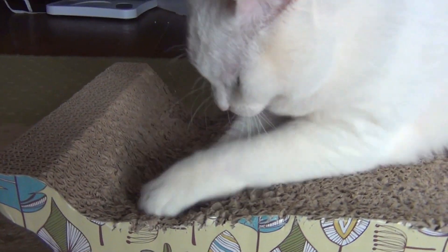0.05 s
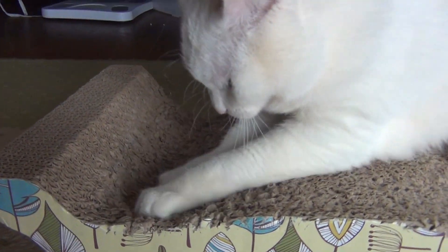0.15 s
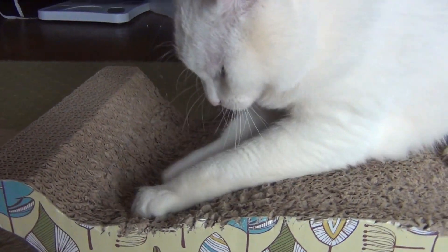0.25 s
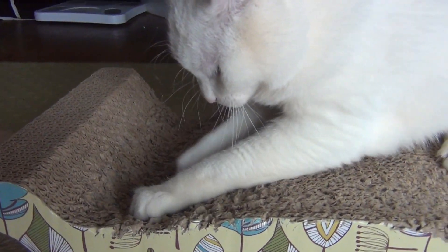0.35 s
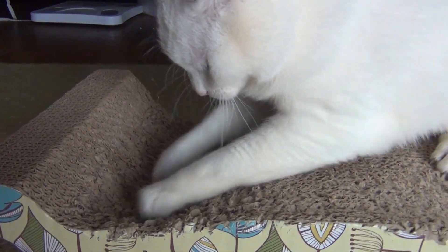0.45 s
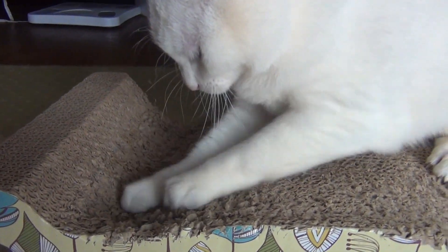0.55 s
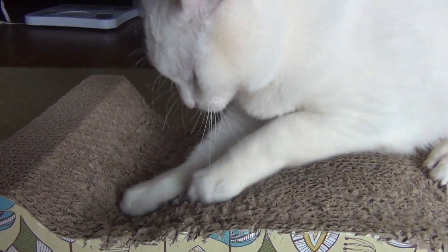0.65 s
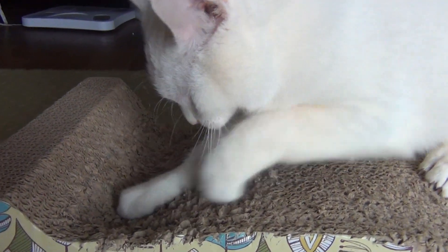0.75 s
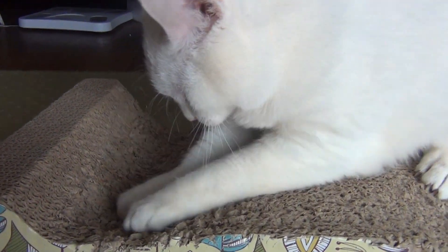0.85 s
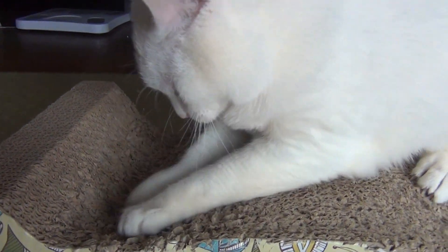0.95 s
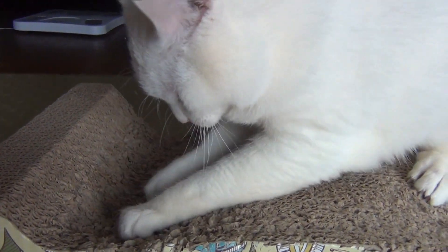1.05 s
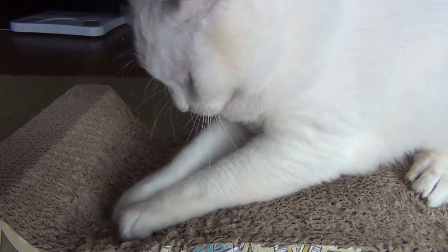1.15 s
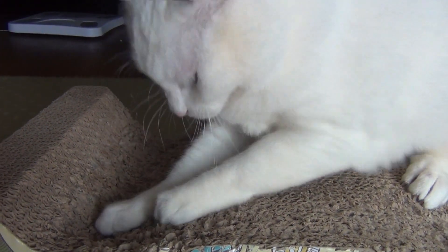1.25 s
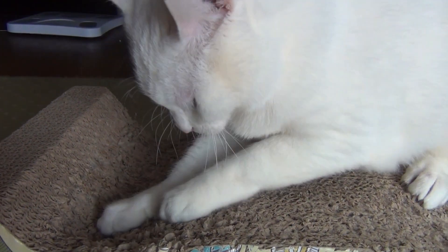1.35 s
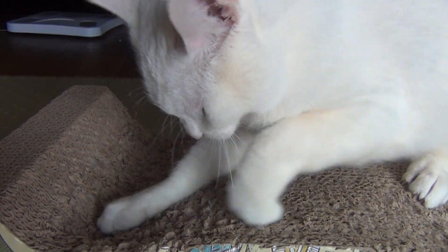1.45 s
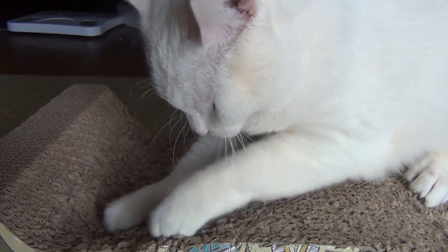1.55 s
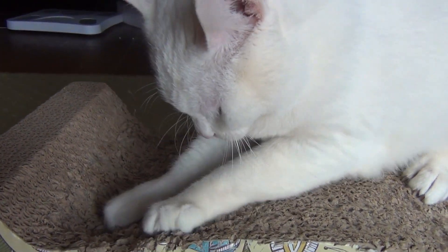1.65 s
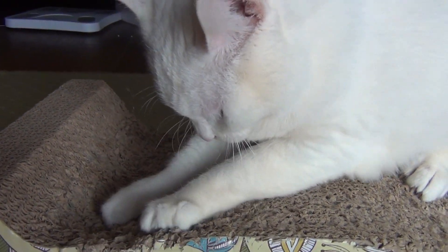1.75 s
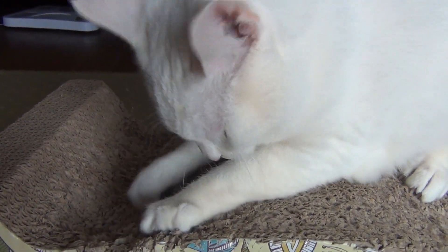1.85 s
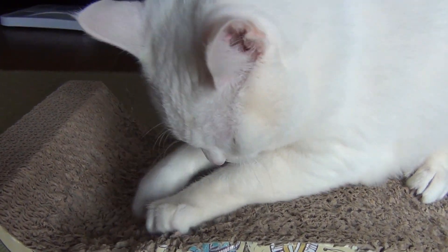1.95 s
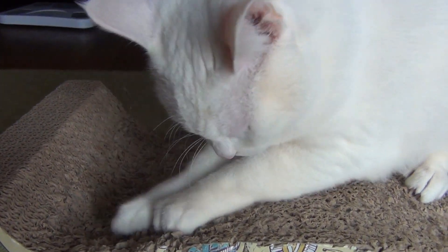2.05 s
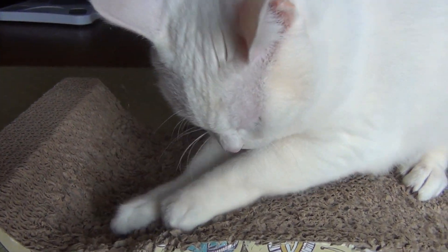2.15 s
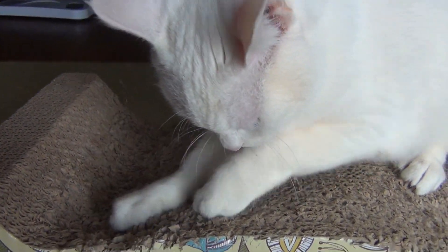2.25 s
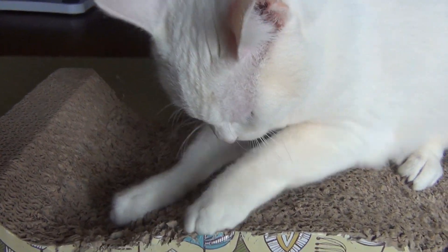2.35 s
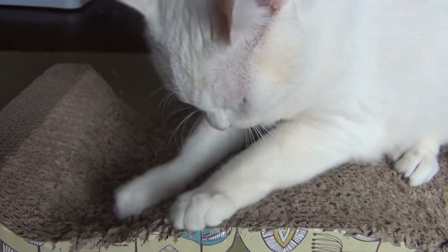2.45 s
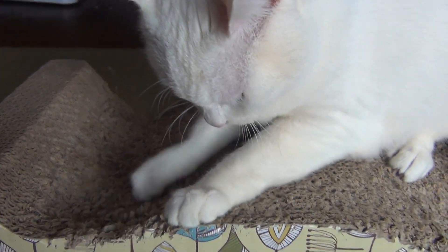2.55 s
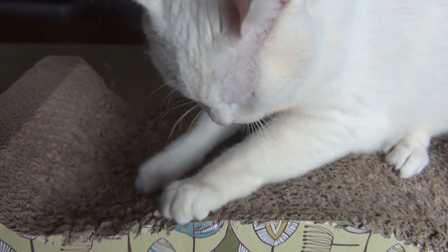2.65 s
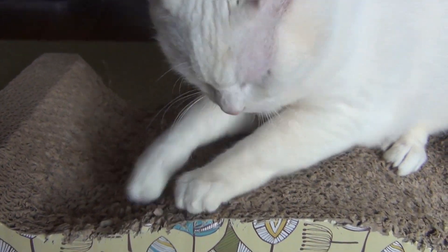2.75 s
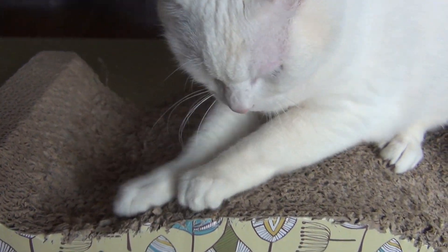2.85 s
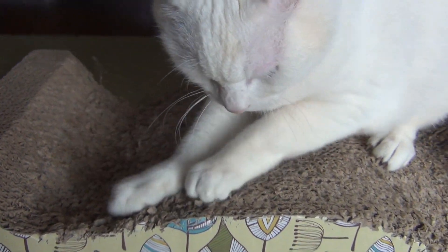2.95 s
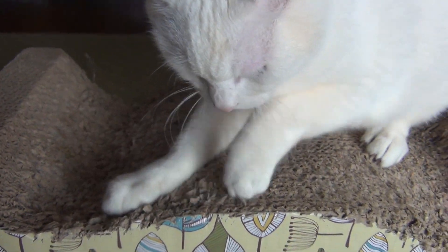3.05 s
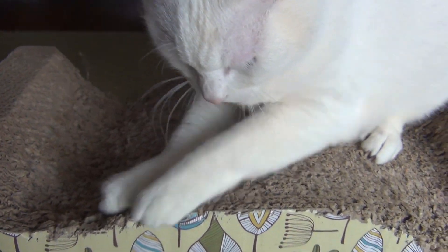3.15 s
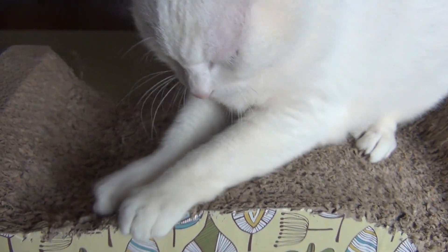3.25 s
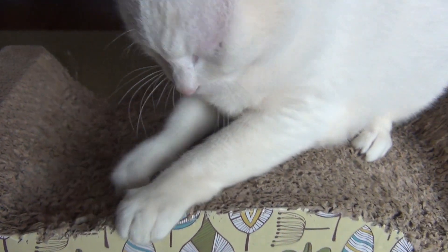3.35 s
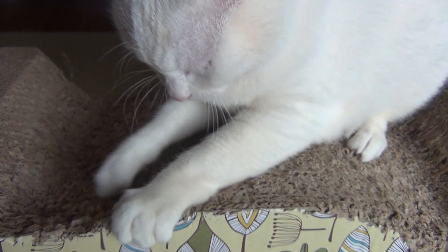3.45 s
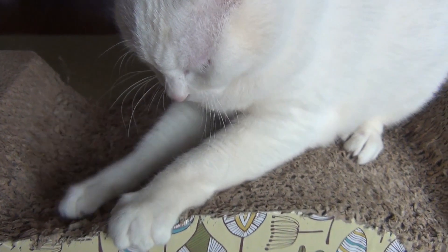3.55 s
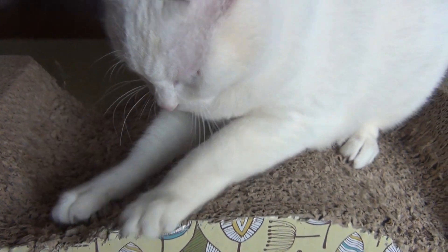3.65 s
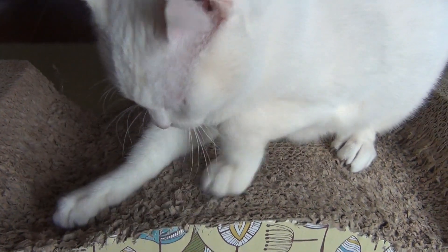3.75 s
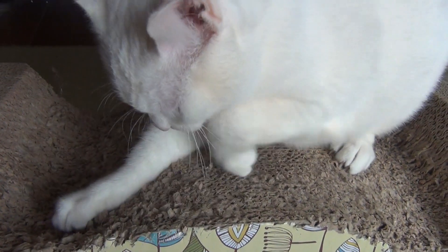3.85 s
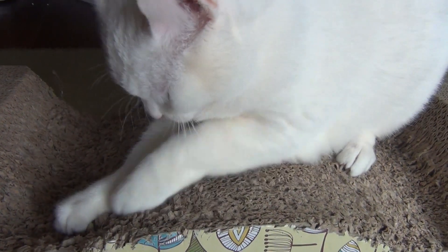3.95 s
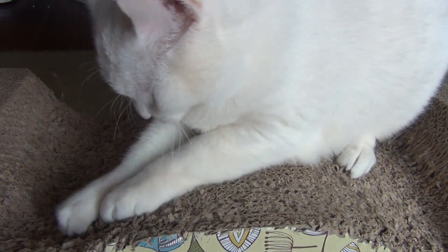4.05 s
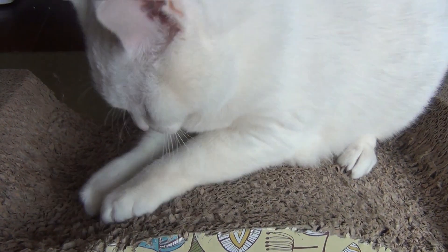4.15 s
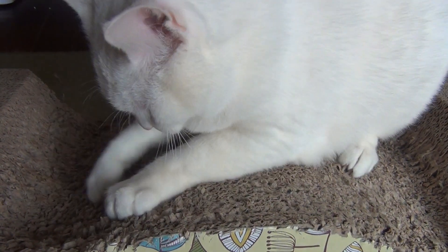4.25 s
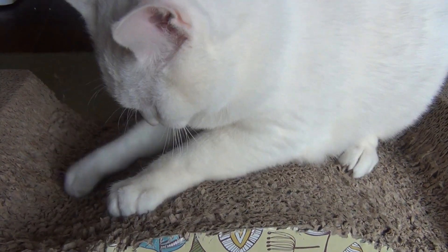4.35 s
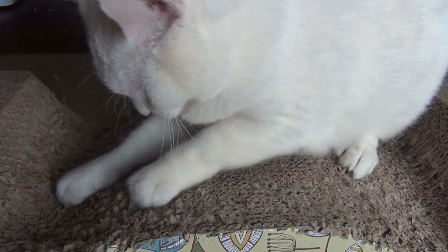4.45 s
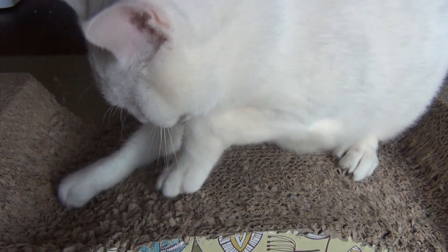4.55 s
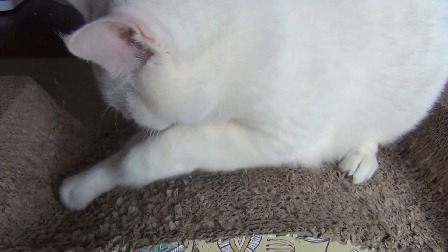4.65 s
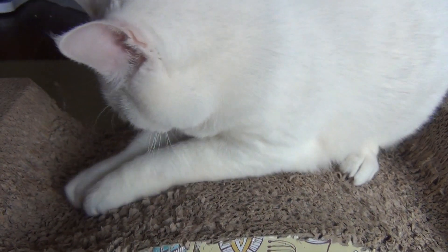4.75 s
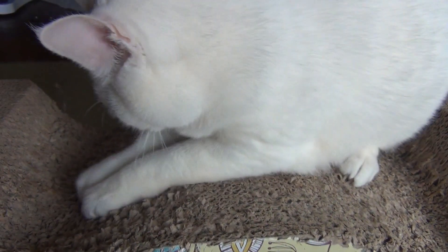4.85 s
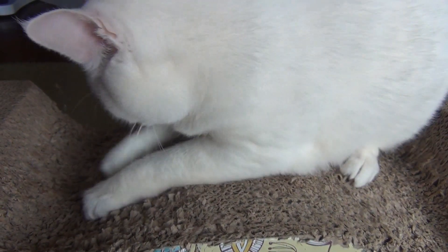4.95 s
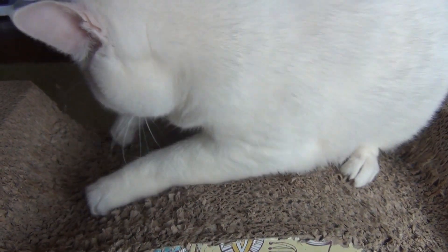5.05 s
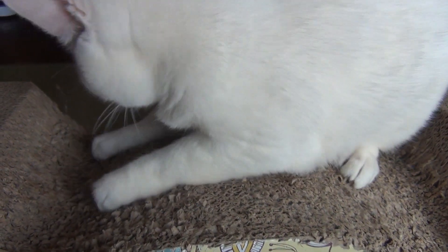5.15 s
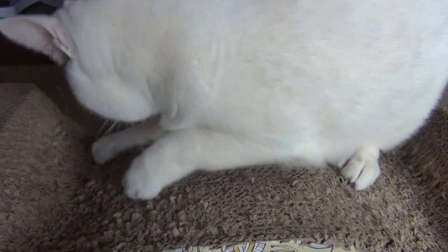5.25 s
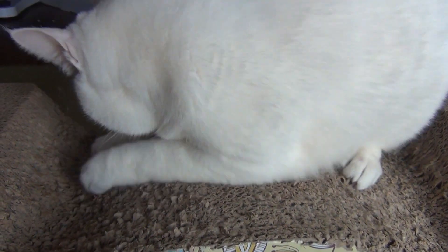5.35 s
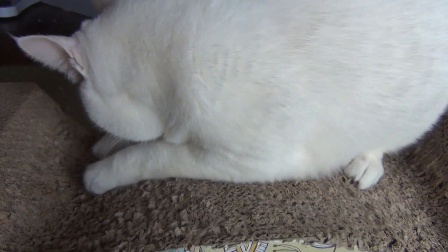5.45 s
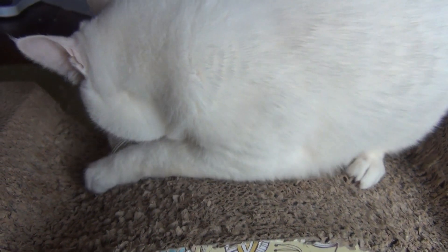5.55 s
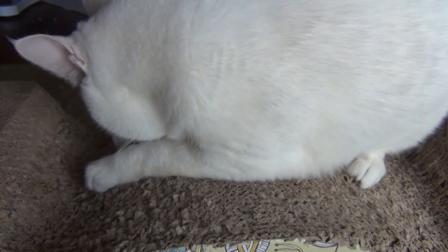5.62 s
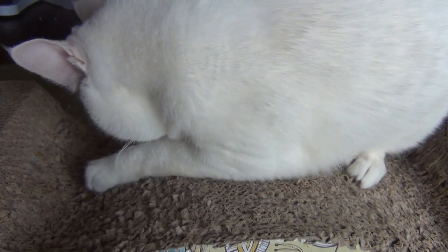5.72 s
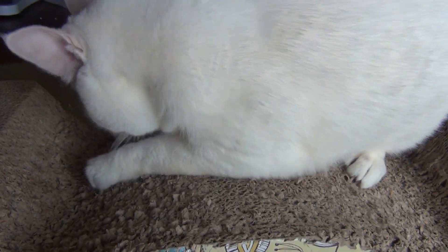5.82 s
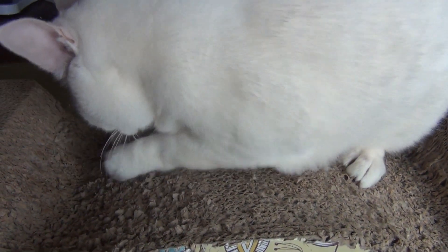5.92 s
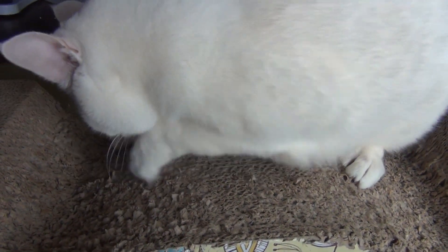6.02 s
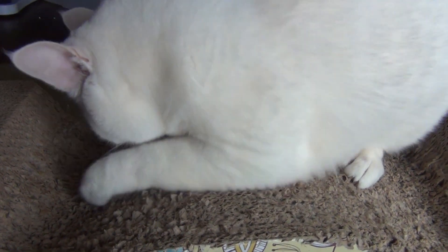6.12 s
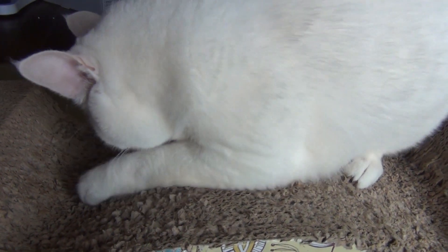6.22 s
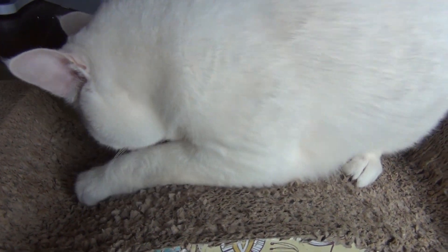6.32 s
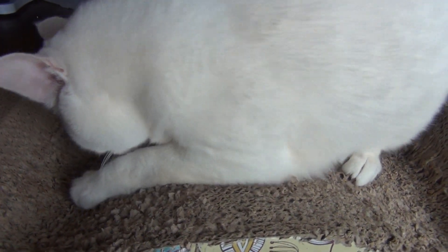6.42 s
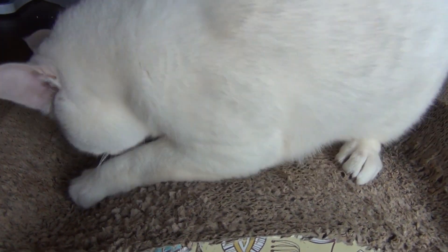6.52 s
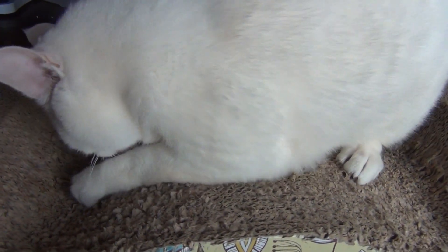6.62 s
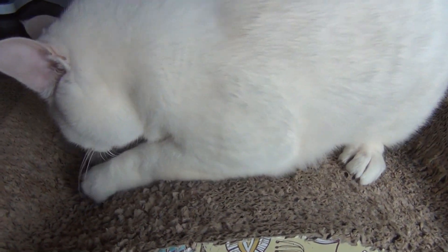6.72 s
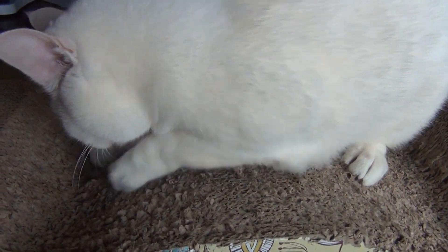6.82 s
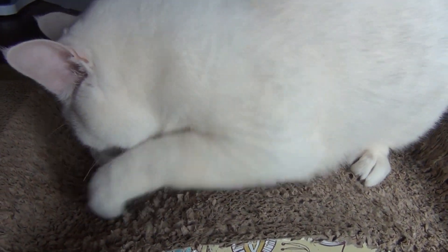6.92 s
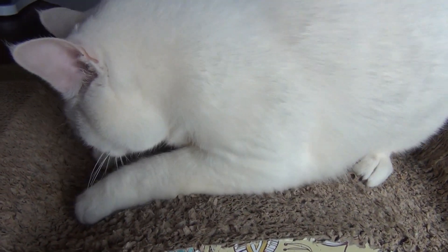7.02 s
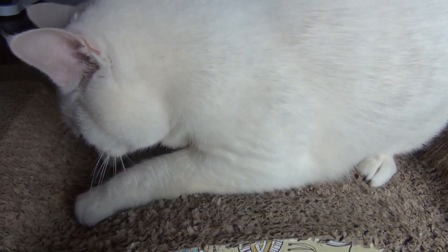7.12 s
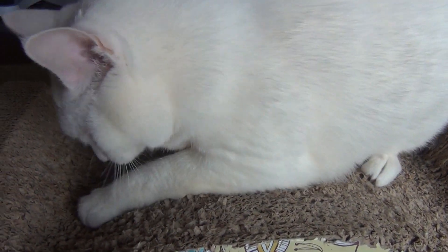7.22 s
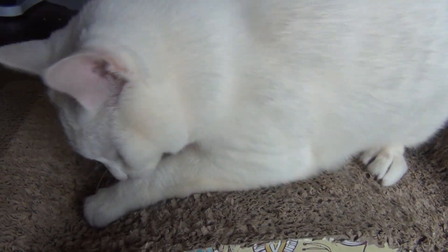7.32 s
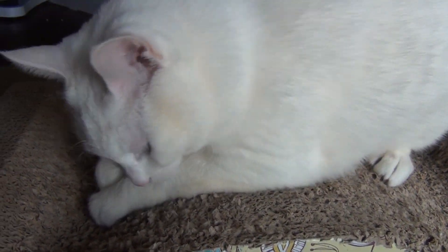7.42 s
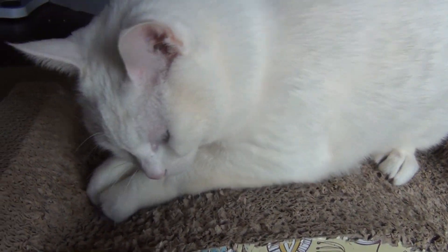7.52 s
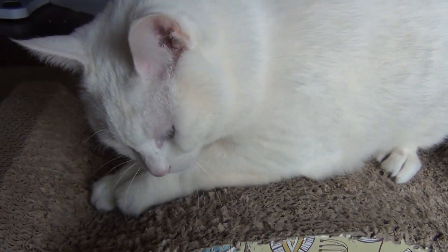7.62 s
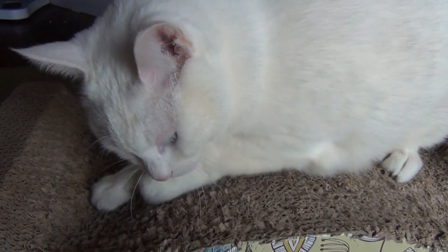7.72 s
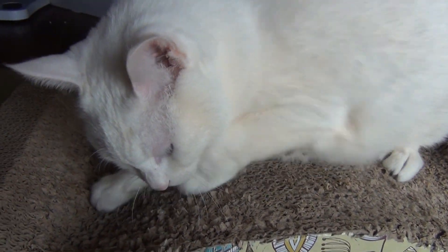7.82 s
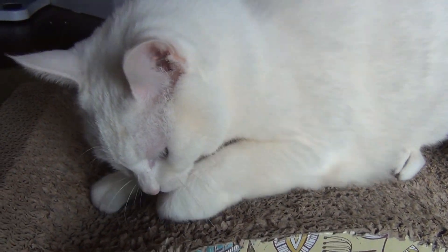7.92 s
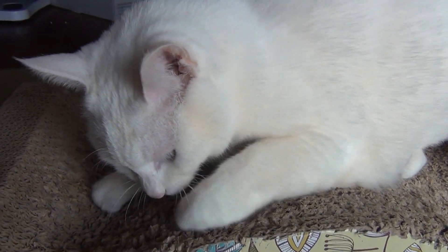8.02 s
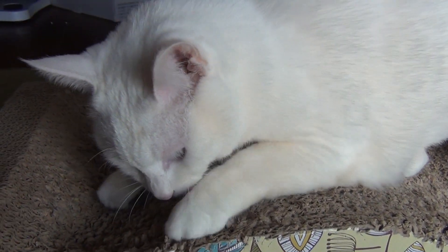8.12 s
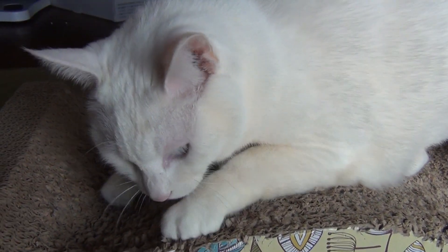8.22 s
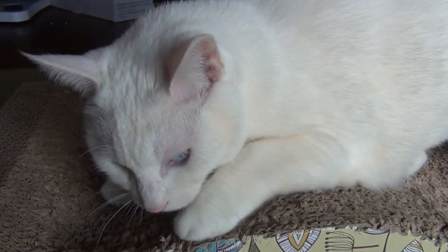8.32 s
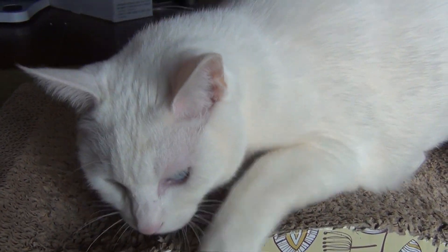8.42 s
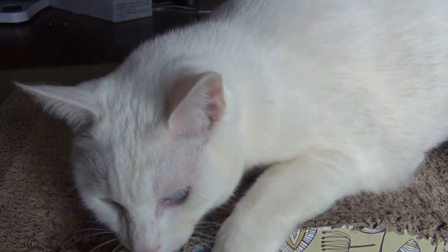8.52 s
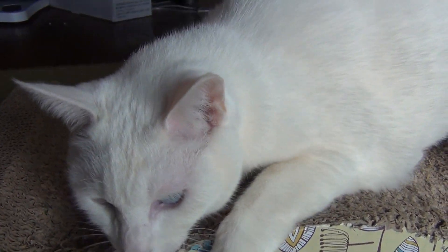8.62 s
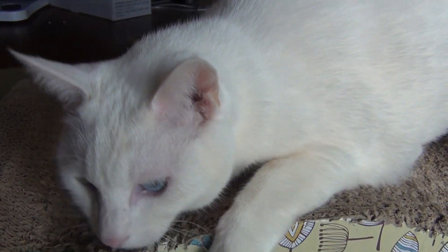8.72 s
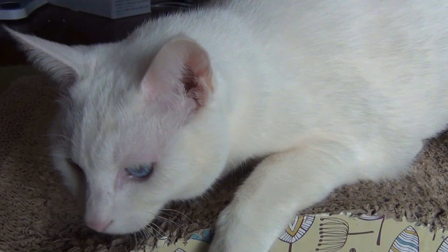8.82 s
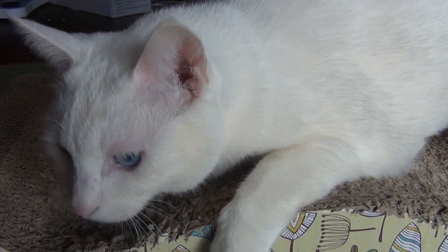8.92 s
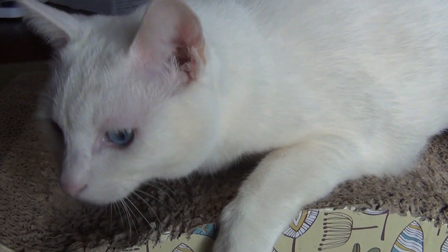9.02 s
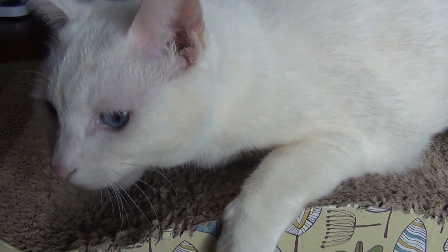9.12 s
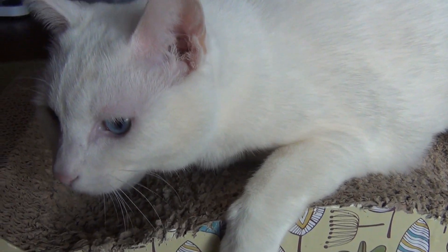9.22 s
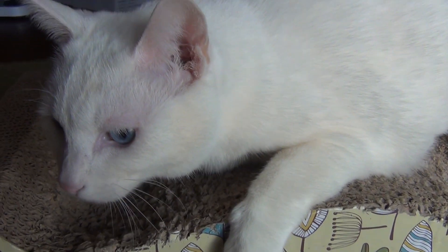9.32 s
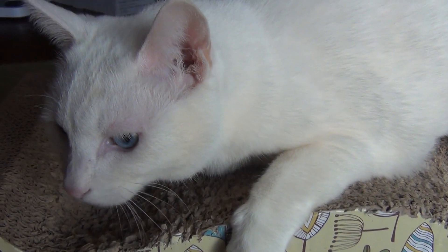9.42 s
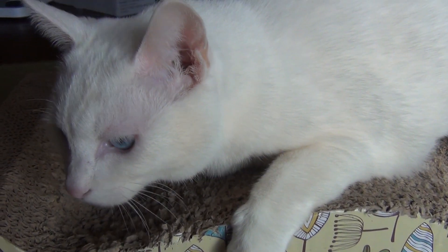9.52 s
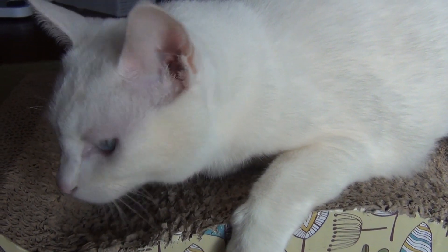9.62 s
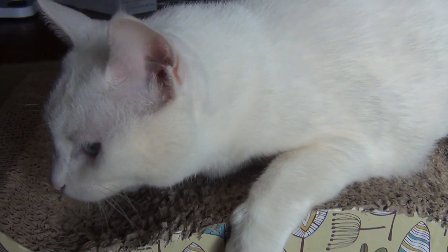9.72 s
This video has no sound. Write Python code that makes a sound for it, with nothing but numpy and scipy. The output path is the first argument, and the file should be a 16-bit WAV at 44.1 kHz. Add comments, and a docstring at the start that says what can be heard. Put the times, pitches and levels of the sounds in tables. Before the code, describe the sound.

Very close in a quiet room, a cat scratches a hollow corrugated cardboard board. Claws catch and snap free in fast irregular clusters, with dry knocks, fibre crackle and dragging paws between them. The first seconds are the hardest; strokes then become softer and raspier, with a few late strong snaps before the scratching dies out near eight and a half seconds, leaving faint hum.

```python
"""A quiet room: a cat rakes its claws over a hollow corrugated cardboard board close by.
Claws catch and tear free in short clusters of snaps: click trains flick the torn cells and ring board modes.
Between them the paws drag (dense small slips) and fibres crackle (sparse clicks through a fibre spectrum).
The scratching dies away and leaves the faint hum of the room, made of coloured noise."""
import sys
import numpy as np
from scipy import signal
from scipy.fft import rfft, irfft, next_fast_len
from scipy.io import wavfile
from scipy.ndimage import uniform_filter1d

SR = 44100
rng = np.random.default_rng(int(sys.argv[2]) if len(sys.argv) > 2 else 0)


def output_pcm(signal):
    """Save a mono or channel-first signal as 16-bit PCM at the path in sys.argv[1].

    Samples are clipped to [-1, 1] before scaling.
    """
    pcm = np.clip(np.atleast_2d(signal).T, -1, 1) * 32767
    wavfile.write(sys.argv[1], SR, np.round(pcm).astype(np.int16))


def attenuation_scalar(level_db):
    """Turn a level in dB into a linear amplitude multiplier (20 dB per decade)."""
    decades = np.asarray(level_db, float) / 20
    return 10 ** decades


N = 430853
CATCH_LEAD_S = 0.03  # time before the strong click inside a catch
STRAIN_DB = -14.5  # fibres strain audibly before a claw lets go
SNAP_CROWD = 0.25  # size of the weaker clicks against the strong one

# a hooked claw lets go at once: (time [s], knock peak [dB], pitch [Hz],
# coarse fibre crack re knock [dB], fine fibre crack re knock [dB])
SNAP_EVENTS = [(0.0817, -6.5, 1870, -6, -33), (0.1874, -20, 1510, -13, -22),
               (0.1929, -10.5, 1940, -7.5, -18), (0.1994, -18, 496, -13.5, -22),
               (0.206, -21, 1280, -18, -28), (0.2088, -11, 1210, -16, -22), (0.3386, -14, 1180, -39, -21),
               (0.406, -22, 1250, -13, -5), (0.4171, -14.5, 900, -30, -18.5),
               (0.489, -8.5, 860, -11.5, -42), (0.572, -21.5, 1330, -5, -6.5),
               (0.5801, -14.5, 950, -18, -11), (0.586, -19, 950, -13, -7), (0.735, -18, 1180, -11, -2.5),
               (0.7907, -19.5, 880, -11, -8.5), (0.858, -19.5, 1630, -12, -31),
               (1.0796, -13, 1400, -14, -31.5), (1.0812, -21, 1490, -20, -34),
               (1.0888, -15.5, 1090, -25, -33), (1.095, -5, 1190, -35, -47), (1.31, -23.5, 1420, -27, -33),
               (1.343, -18.5, 1500, -10, -20), (1.3497, -3, 1470, -29, -36), (1.3549, -14, 796, -21.5, -25),
               (1.3584, -19.5, 910, -21.5, -25), (1.367, -23.5, 1400, -19.5, -22),
               (1.533, -24, 797, -22, -5), (1.628, -25.5, 1870, -8, -9), (1.645, -23, 1100, -3, -22),
               (1.675, -25.5, 1035, -3.5, -0.5), (1.807, -19.5, 1210, -14, -47.5),
               (1.9255, -2.5, 1386, -26, -32), (1.93, -16, 1420, -17, -23), (1.9348, -15.5, 423, -30, -26),
               (2.2869, -27.5, 1700, -4, -8), (2.294, -17, 1580, -5.5, -1), (2.393, -22, 730, -16, -1.5),
               (2.441, -25, 840, -4.5, -12), (2.569, -22, 820, -0.5, -12), (2.65, -5, 1420, -10, -21),
               (2.655, -25.5, 910, -22, -27), (2.745, -40, 1700, 6.5, 15), (2.8471, -11.5, 990, -15, -13),
               (2.8539, -12.5, 640, -20, -26), (3.266, -30.5, 760, -2, 5.5), (3.4557, -18, 803, -9, -3),
               (3.4623, -19, 363, -7, 1), (3.4748, -21.5, 402, -22, -20), (3.797, -12.5, 290, -19, -15),
               (3.946, -22, 1340, -8, -18), (4.1234, -20, 795, -21, -17), (4.2295, -17.5, 1380, -15, -7),
               (4.241, -26, 1280, -17, -18), (4.379, -27.5, 860, -17, -13.5),
               (4.535, -24.5, 870, -22, -1.5), (4.5827, -10, 1220, -32, -23.5),
               (4.9341, -24.5, 1220, -15, -8), (5.001, -28, 1310, -28, -2), (5.085, -20, 716, -16, -13.5),
               (5.202, -32, 960, 3.5, -10), (5.273, -30.5, 925, -6, 0.5), (5.317, -23, 1380, -1, -1.5),
               (5.422, -32.5, 850, -12, -42), (5.541, -25.5, 880, -9.5, -19), (5.61, -25, 810, -8, -9.5),
               (5.894, -41, 1580, 2, 8), (5.908, -25, 1720, -9, -28), (5.966, -41, 1390, -1, -17),
               (6.035, -19, 617, -12, -6.5), (6.271, -28, 925, -27, -3.5), (6.719, -26.5, 510, -14, -33),
               (6.8521, -26, 1400, -20, -24), (6.8556, -14, 780, -33, -16.5),
               (6.901, -27.5, 533, -30, -19.5), (7.245, -20, 760, -30, -24), (7.3632, -8, 900, -17, -22),
               (7.3669, -10.5, 700, -25, -22), (7.3766, -26, 603, -23, -32), (7.3811, -19, 595, -20, -34),
               (7.484, -28, 980, -8, -17), (7.64, -32.5, 626, -32, -32), (7.709, -31, 450, -10, -8),
               (7.728, -24.5, 1150, -16, -12.5), (7.907, -41, 1310, 12, 0), (8.116, -44, 620, 5, -36)]
# a claw rips through a cell wall, building up before it gives: (time [s], knock peak [dB], pitch [Hz],
# coarse fibre crack re knock [dB], fine fibre crack re knock [dB])
RIP_EVENTS = [(0.043, -22.5, 1420, -8, -6.5), (0.219, -15, 1060, -16, -16),
              (0.223, -17.5, 1120, -12, -10.5), (0.278, -25, 1930, -1.5, 0.5), (0.502, -44, 507, -20, -44),
              (0.657, -31, 1000, 5, -24), (0.665, -31.5, 890, 1, -23), (0.808, -25, 760, -21, -1.5),
              (0.963, -23, 1420, -8.5, -20), (1.02, -55, 1200, -8, -21), (1.1034, -31, 1110, -25, -34),
              (1.153, -32.5, 560, 6, 12.5), (1.161, -21.5, 940, -4.5, -22), (1.214, -23.5, 940, -6.5, -11),
              (1.385, -38, 330, -27, -60.5), (1.683, -21.5, 1820, -34.5, -43), (2.032, -35, 1610, 1, 13.5),
              (2.173, -28, 830, -8, -1), (2.184, -26, 645, -19, -15), (2.557, -28, 1550, -37, -20),
              (2.661, -21, 785, -22, -9), (2.763, -38.5, 655, -9, 24), (2.879, -18, 603, -32, -20),
              (2.997, -30, 876, -3, 20.5), (3.012, -26.5, 560, 2, 5), (3.102, -28, 716, 6, 10.5),
              (3.173, -27, 560, -3, 3), (3.211, -35, 540, 1, -12), (3.465, -34, 425, -2, -3),
              (3.486, -25, 860, -28, -3), (3.596, -34, 560, 2, 11), (3.614, -25.5, 970, -51.5, -51),
              (3.653, -33, 1220, -1.5, -24), (3.781, -46, 690, 16, 35), (3.794, -26, 1110, -5, 16.5),
              (3.873, -37, 470, -13, 17), (4.001, -37, 890, -4, -21), (4.394, -33, 500, -8, -12),
              (4.558, -34, 710, -8, 6), (4.694, -39, 960, -11, 7), (4.827, -25.5, 790, -10.5, -9),
              (5.144, -32, 690, -19, -14), (5.175, -28, 850, -7, -21), (5.211, -21, 920, -16, -19),
              (5.333, -21, 796, -19.5, -18), (5.622, -25.5, 456, -21, -12), (5.777, -21.5, 750, -15.5, -17),
              (5.911, -31, 876, -3, -36), (5.976, -24.5, 605, -6, -6), (6.136, -26.5, 447, -8.5, 2),
              (6.282, -24, 1380, -6.5, -42), (6.472, -28, 1010, -10, -9), (6.559, -18, 645, -11, -14.5),
              (6.576, -24, 493, -16, -23), (6.795, -26.5, 560, -12, -19), (6.97, -23.5, 560, -12.5, -1.5),
              (7.049, -31, 645, -13.5, -10), (7.531, -32.5, 1360, -23, -6), (7.656, -33, 920, -12, -32),
              (7.813, -35.5, 430, -4, -0.5), (7.88, -38.5, 1100, -6, 2), (7.928, -29, 573, -16, -31),
              (7.937, -26.5, 590, -10, -31), (8.171, -64, 1030, -10, -5), (8.302, -44, 1490, -20, -33),
              (8.542, -47.5, 710, 0, 7), (8.591, -41.5, 774, -4, -11)]
# soft cardboard knocks carry little treble: (frequency [Hz], gain [dB])
DULL_KNOCK = [(2050, -7), (2600, -14), (5000, -17)]


def evened(x):
    """Scales to rms 1."""
    return x / np.sqrt(np.mean(x ** 2) + 1e-20)


def read(points, hz):
    """Interpolates a table on a log-frequency axis."""
    f, value = np.transpose(points)
    return np.interp(np.log(hz + 1), np.log(f + 1), value)


def add(mix, start_s, sound):
    """Mixes a sound in at start_s."""
    part = mix[max(round(start_s * SR), 0):][:len(sound)]
    part += sound[:len(part)]


def colour(x, points):
    """Shapes the spectrum of x by a table of dB."""
    size = next_fast_len(x.shape[-1])
    gain = attenuation_scalar(read(points, np.fft.rfftfreq(size, 1 / SR)))
    return irfft(rfft(x, size) * gain, size)[..., :x.shape[-1]]


def crackle(count, per_s, spread_db):
    """Sparse clicks of random sign, mostly small, a few large."""
    hit, sign, size = rng.random((count, 3)).T
    level_db = spread_db * np.minimum(-np.log(size + 1e-9), 4)
    return (hit < per_s / SR) * np.sign(sign - 0.5) * attenuation_scalar(level_db)


def claws():
    """All catches, ticks and strokes of the claws."""
    return snaps() + settling() + rips() + ticks() + rakes() + pulls()


def snaps():
    """Claws let go at once: a quick build-up, then a tear."""
    out = np.zeros(N)
    for s, peak_db, hz, rasp_db, hiss_db in SNAP_EVENTS:
        snap = catch(peak_db, hz, rasp_db, hiss_db, 1.6, tear_ms(hiss_db), STRAIN_DB, SNAP_CROWD)
        add(out, s - CATCH_LEAD_S - 0.7 / hz, snap)  # the peak comes most of a cycle after release
    return out


def settling():
    """After each snap the board settles with a duller knock, an octave lower."""
    delay_s, level_db, pitch_ratio = 0.011, -22, 0.5
    out = np.zeros(N)
    for s, peak_db, hz, rasp_db, hiss_db in SNAP_EVENTS:
        knock = catch(peak_db + level_db, hz * pitch_ratio, rasp_db, hiss_db, build_ms=5, tear_ms=18)
        add(out, s - CATCH_LEAD_S + delay_s, knock)
    return out


def rips():
    """Cell walls give slowly: a long build-up with more weak clicks' force, then a tear."""
    out = np.zeros(N)
    for s, peak_db, hz, rasp_db, hiss_db in RIP_EVENTS:
        rip = catch(peak_db, hz, rasp_db, hiss_db, 8.2, tear_ms(hiss_db), STRAIN_DB, crowd=0.45)
        add(out, s - CATCH_LEAD_S - 0.7 / hz, rip)
    return out


def ticks():
    """Single dry fibres crack: very short catches."""
    # (time [s], knock peak [dB], pitch [Hz], coarse crack re knock [dB], fine crack re knock [dB])
    tick_events = [(2.03, -40, 1500, 3, 6), (2.229, -41.5, 1490, 10, 1.5), (2.401, -19.5, 1720, 6.5, -13),
                   (2.741, -29, 1700, 9, 18), (2.998, -34, 900, 5, 9), (3.7945, -31, 1200, 2.5, 6),
                   (6.718, -37, 1700, 7, -8), (2.8436, -12.5, 1320, 7, 4), (2.8487, -19, 1400, 8, 4),
                   (5.111, -30, 1290, -5, -13), (5.154, -32, 1500, 5, -12), (7.934, -30, 927, 11, 13.5),
                   (8.4608, -55, 910, -10, 12), (8.544, -41, 784, 2, 10), (8.58, -49, 900, 4.5, 6.4),
                   (9.579, -55, 1500, 8.5, 18)]
    out = np.zeros(N)
    for s, *crack in tick_events:
        add(out, s - CATCH_LEAD_S, catch(*crack, build_ms=0.5, tear_ms=1.5, crowd=SNAP_CROWD))
    return out


def rakes():
    """Several claws rake across a row of cells without a pause, losing force from start to end."""
    # (start [s], length [s], knock level [dB], pitch [Hz],
    # coarse fibre crack re knock [dB], fine fibre crack re knock [dB])
    rake_events = [(0.185, 0.055, -34, 700, -15, -26), (0.552, 0.07, -46, 1100, -18, -37),
                   (0.641, 0.028, -40.5, 1220, -21, -19), (1.08, 0.024, -38, 1330, -21, -32),
                   (1.35, 0.027, -40, 1400, -20, -17), (1.925, 0.017, -45, 1200, -47, -22),
                   (2.706, 0.11, -49.5, 1300, -3, 7.5), (2.845, 0.034, -35, 596, -10.5, -7),
                   (2.995, 0.039, -45.5, 1200, -24, -5), (3.455, 0.028, -40.5, 380, -8.5, -16),
                   (3.792, 0.046, -43.5, 330, -18, -8), (4.229, 0.035, -40.5, 340, -19, -39),
                   (4.522, 0.073, -42, 1000, -13, -16), (4.82, 0.026, -49, 1180, -31, -21),
                   (4.985, 0.024, -55.5, 1100, -15, -25), (5.008, 0.025, -52, 850, -16, -15),
                   (5.066, 0.028, -49.5, 1000, -17, -24), (5.13, .06, -44.5, 1100, -16.5, -24),
                   (5.256, 0.027, -55, 900, -13, -23), (5.306, 0.041, -42.5, 900, -23, -24),
                   (5.755, .045, -53.5, 890, -19, -17), (5.843, 0.026, -57, 1000, -29, -16),
                   (6.52, 0.033, -58, 800, -10, -11), (6.581, 0.037, -52.5, 600, -16, -18),
                   (6.654, 0.026, -59.5, 1300, -12, -20), (6.728, 0.047, -47.5, 600, -15, -19.5),
                   (6.8, 0.019, -55.5, 500, -17, -24), (4.372, 0.058, -50.5, 600, -16, -24),
                   (4.31, 0.044, -58, 1400, -10, -18), (5.962, 0.043, -45, 1190, -28, -17),
                   (6.029, 0.045, -48, 1300, -28, -10), (7.365, 0.018, -38.5, 396, -23, -24.5),
                   (7.85, .014, -62, 800, -11, -15), (7.871, 0.0091, -54, 1100, -19.5, -17),
                   (7.9, 0.023, -52.5, 1300, -13, -2), (7.921, 0.045, -53.5, 700, -18, -30),
                   (8.114, 0.047, -55.5, 350, -17, -28), (8.151, 0.014, -67.5, 900, -12, -13),
                   (8.162, 0.044, -55.5, 1300, -10, -6.5), (8.251, 0.09, -64, 1400, -16, 5.5),
                   (8.578, 0.019, -69, 910, 2, 12)]
    out = np.zeros(N)
    for s, *settings in rake_events:
        add(out, s, stroke(*settings, change_db=-11.5))
    return out


def pulls():
    """A hooked claw pulls harder and harder before it tears free."""
    # (start [s], length [s], knock level [dB], pitch [Hz],
    # coarse fibre crack re knock [dB], fine fibre crack re knock [dB])
    pull_events = [(1.066, .012, -43.5, 1200, -20.5, -27), (1.331, 0.017, -38.5, 1300, -12.5, -16),
                   (1.906, 0.019, -39.5, 1100, -17, -20.5), (2.822, 0.028, -44, 900, 1, 8.5),
                   (3.778, 0.019, -49.5, 700, -7, -9.5), (4.107, 0.018, -50, 1200, -23, -15),
                   (4.217, 0.014, -47, 1300, -9.5, -13), (7.233, .011, -58.5, 890, -16, -26),
                   (4.912, 0.022, -57, 900, -15, -20), (7.349, 0.016, -44.5, 1300, -33, -17)]
    out = np.zeros(N)
    for s, *settings in pull_events:
        add(out, s, stroke(*settings, change_db=20.5))
    return out


def catch(peak_db, hz, rasp_db, hiss_db, build_ms, tear_ms, strain_db=-60, crowd=0.6):
    """One strong click amid weaker ones; each flicks the torn cell, rings the board and cracks fibres."""
    count, lead = 4096, round(CATCH_LEAD_S * SR)
    flick_decay_cycles, ring_db, strain_ms = 0.59, -1, 14
    t = (np.arange(count) - lead) / SR
    before_ms, after_ms = np.minimum(t, 0) * 1000, np.maximum(t, 0) * 1000
    rise = np.exp(before_ms / np.clip(build_ms, 0.5, 12))
    fade = np.exp(-after_ms / np.clip(tear_ms, 1, 20))
    clicks = crowd * np.clip(0.9 * crackle(count, 1500, spread_db=0.5), -1, 1) * rise * fade
    clicks[lead] = 1

    cycles = np.arange(600) / SR * hz
    flick = cycles * np.exp(-cycles / flick_decay_cycles) * np.sin(2 * np.pi * cycles)
    cell = signal.fftconvolve(clicks, flick / np.linalg.norm(flick))[:count]
    board = signal.fftconvolve(clicks, ring(hz))[:count]
    knock = cell + attenuation_scalar(ring_db) * board

    strain = attenuation_scalar(strain_db) * np.exp(before_ms / strain_ms)
    loose = 0.2 * crackle(count, 7900, spread_db=6.0)
    loose = loose * np.maximum(rise, strain) * fade ** 2.08  # loose fibres fade faster
    parts = (colour(knock, DULL_KNOCK), *split(clicks + loose))
    return sum(attenuation_scalar(peak_db + db) * part / abs(part).max() for db, part in zip((0, rasp_db, hiss_db), parts))


def tear_ms(hiss_db):
    """Decay time of the tear, rising smoothly with the fine fibre crack."""
    return 0.9 + 10.7 / (1 + 0.5 * np.exp((-17 - hiss_db) / 6.5))


def ring(near_hz, reach=0.92, crowd=0.046, body=0.79):
    """The board struck at a random spot: families of six close modes, strongest near the blow's pitch."""
    # mode families: (frequency [Hz], level [dB], T60 [s])
    board_modes = [(110, -27, 0.16), (185, -26, 0.03), (274.6, -7.5, 0.05), (324.8, -4.5, 0.068),
                   (560, -6, 0.049), (673, -5.5, 0.025), (865, 2, 0.024), (980, 4, 0.0092),
                   (1220, -4.5, 0.028), (1420, 1.5, 0.022), (1717, 9.5, 0.0097), (1820, 12.5, 0.0023),
                   (2125, -0.5, 0.009), (3392, -6, 0.025), (4170, -27, 0.0028)]
    hz, db, t60 = np.repeat(board_modes, repeats=6, axis=0).T[:, :, None]
    t = np.arange(2560) / SR
    shift, spot = rng.standard_normal((2, len(hz), 1))
    nearness = np.exp(-(np.log(hz / near_hz) / reach) ** 2)
    weight = np.tanh(2 * spot) * (body * (hz < near_hz) + nearness)  # the low body always joins
    modes = weight * attenuation_scalar(db - 60 * t / t60) * np.sin(2 * np.pi * hz * (1 + crowd * shift) * t)
    total = modes.sum(0)
    return total / np.linalg.norm(total)


def stroke(length_s, level_db, hz, rasp_db, hiss_db, change_db):
    """A run of uneven snags, each ringing one of three spots of the board; the force changes by change_db."""
    count, snags_per_s, edge_s = 4096, 1200, 0.0022
    t = np.arange(count) / SR
    onset = np.clip(t / edge_s, 0, 1)
    release = np.exp(-np.maximum(t - length_s, 0) / edge_s)
    shape = onset * release * attenuation_scalar(change_db * np.minimum(t / length_s, 1))
    snags = [shape * crackle(count, snags_per_s / 3, spread_db=2.5) for spot in range(3)]
    knock = sum(signal.fftconvolve(run, ring(hz, reach=1.3, body=0.66))[:count] for run in snags)
    loose = 0.54 * shape * crackle(count, 4300, spread_db=3.0)
    parts = (colour(knock, DULL_KNOCK), *split(sum(snags) + loose))
    hold = np.sqrt(count / (length_s * SR))  # refers the rms to the stroke's length
    return sum(attenuation_scalar(level_db + db) * hold * evened(part) for db, part in zip((0, rasp_db, hiss_db), parts))


def split(x):
    """Fibre sound as a coarse rasp below about 5 kHz and a fine hiss above."""
    # fibre spectrum: (frequency [Hz], level [dB per Hz])
    fibre_spectrum = [(1470, -11.5), (2500, 3), (3000, 6), (3620, -0.5), (5380, 5), (6680, 7.5), (7240, 6),
                      (9800, 8), (12700, -58.5), (21600, -120)]
    coarse_hz = 5020
    fibres = colour(x, fibre_spectrum[:-2])
    rasp = colour(fibres, [(coarse_hz / 1.15, 0), (coarse_hz * 1.2, -30)])
    return rasp, fibres - rasp


def drag():
    """Dense small slips excite several spots of the board; fibres crackle on top, both in clumps."""
    rumble_db, rasp_db, hiss_db = effort()
    clumps_db = 2.7 * evened(uniform_filter1d(rng.standard_normal(N), 1500))
    slips = np.zeros(N)
    for hz in np.geomspace(250, 1800, 8):
        slips += signal.oaconvolve(crackle(N, 120, spread_db=3.0), ring(hz, reach=8.8))[:N]
    rasp, hiss = split(patchy(crackle(N, 2200, spread_db=3.8), patchy_db=3.5))
    fibres = attenuation_scalar(rasp_db) * evened(rasp) + attenuation_scalar(hiss_db) * evened(hiss)
    return attenuation_scalar(clumps_db) * (attenuation_scalar(rumble_db) * evened(slips) + fibres)


def effort():
    """Rumble, rasp and hiss in dB: the slow drag plus a dying skid of the paw after every snap and rip."""
    # paws dragging between catches: (time [s], board rumble [dB], fine fibre hiss [dB])
    drag_levels = [(0.0, -40, -46.5), (0.09, -49.5, -61.5), (0.72, -41.5, -50), (0.92, -47.5, -63),
                   (1.5, -43, -50.5), (1.74, -53, -63), (1.94, -48.5, -63.5), (2.15, -45.5, -49.5),
                   (2.4, -50.5, -51), (3.0, -47.5, -50), (3.3, -57, -57.5), (3.78, -58.5, -51.5),
                   (3.97, -53, -61.5), (4.46, -51, -58.5), (4.87, -57, -64.5), (5.05, -48, -62),
                   (5.19, -48, -49.5), (5.38, -50.5, -62.5), (5.67, -52, -70), (6.03, -50, -59.5),
                   (6.42, -59.5, -76), (6.9, -47.5, -53), (7.05, -55, -80), (7.25, -60, -66),
                   (7.51, -49, -67), (7.98, -56, -63), (8.08, -58, -62), (8.38, -68.5, -63.5),
                   (8.5, -69, -55), (8.7, -71, -76)]
    firmness = 0.9  # harder catches skid only partly louder
    rasp_db, rumble_share = -6.5, 0.3  # the rasp's level is set from rumble and hiss
    t = np.arange(0, N + 64, 64) / SR
    s, *columns = np.transpose(drag_levels)
    at, peak_db, _, _, fine_db = np.transpose(SNAP_EVENTS + RIP_EVENTS)[:, :, None]
    starts_db, skids_db, t60s = (peak_db, peak_db + fine_db), (-33.5, -24), (0.54, 0.22)
    levels = []
    for column, start_db, skid_db, t60 in zip(columns, starts_db, skids_db, t60s):
        decay_db = -60 * np.maximum(t - at, 0) / t60
        skids = (t > at) * attenuation_scalar(skid_db + firmness * start_db + decay_db)
        power = attenuation_scalar(np.interp(t, s, column, right=-200)) ** 2 + (skids ** 2).sum(0)
        levels.append(np.interp(np.arange(N) / SR, t, 10 * np.log10(power)))
    rumble, hiss = levels
    return rumble, rasp_db + rumble_share * rumble + (1 - rumble_share) * hiss, hiss


def patchy(x, patchy_db):
    """The colour wanders in small time-frequency patches."""
    z = signal.stft(x, nperseg=256)[2]
    patches = uniform_filter1d(uniform_filter1d(rng.standard_normal(z.shape), 6, 0), 10, 1)
    return signal.istft(z * attenuation_scalar(patchy_db * evened(patches)), nperseg=256)[1][:len(x)]


def thumps():
    """The whole board rocks on the floor under a heavy pull: low sine bursts."""
    # (time [s], envelope peak [dB], pitch [Hz])
    thump_events = [(0.185, -54, 102), (1.076, -47, 100), (1.344, -46, 110), (1.922, -49, 110),
                    (3.452, -49, 95), (4.82, -53, 94), (5.77, -47, 83), (6.04, -53, 80), (6.549, -47, 59),
                    (6.88, -56, 90), (6.98, -56, 110), (7.56, -56, 100), (7.93, -49, 107)]
    rise_s = 0.016
    out, t = np.zeros(N), np.arange(6000) / SR
    for s, peak_db, hz in thump_events:
        u = t / rise_s
        add(out, s, attenuation_scalar(peak_db) * u * np.exp(1 - u) * np.sin(2 * np.pi * hz * t))
    return out


def tail(t60_points, first_s):
    """A noise tail of energy 1 from first_s on, each band dying at its own speed."""
    hz, t, z = signal.stft(rng.standard_normal(SR // 2), SR, nperseg=128)
    decay = attenuation_scalar(-60 * t / read(t60_points, hz)[:, None])
    out = signal.istft(z * decay, SR, nperseg=128)[1]
    out = out * (np.arange(len(out)) > first_s * SR)
    return out / np.linalg.norm(out)


def hum():
    """Steady air and machine hum: coloured stereo noise, wide in the middle of the range."""
    # hum spectrum: (frequency [Hz], level [dB per Hz])
    hum_spectrum = [(18, -49.5), (30, -24), (214, -7), (638, -7.5), (833, 0), (1060, -7.5), (2200, -12.5),
                    (2420, -14), (5020, -15.5), (5810, -18), (6710, -19.5), (9200, -21.5), (9900, -18.5),
                    (12900, -45), (21800, -120)]
    # left-right difference against the sum: (frequency [Hz], level [dB])
    hum_spread = [(60, -11), (110, -15), (200, -26.5), (380, -3.5), (700, -3), (1290, -2.5), (2380, -16.5),
                  (4400, -24), (8120, -13.5), (15000, -17.5)]
    level_db = -63.5
    mid, side = colour(rng.standard_normal((2, N)), hum_spectrum[:-2])
    return attenuation_scalar(level_db) * evened(mid + colour(side, hum_spread) * [[1], [-1]])


def scene():
    """The board in the middle; the room adds a short tail, near surfaces a little width."""
    # a small board radiates little bass: (frequency [Hz], gain [dB])
    thin_bass = [(25, -28.5), (60, -9), (130, -2.5), (230, -1.5)]
    # room decay: (frequency [Hz], T60 [s])
    room_decay = [(150, 0.18), (700, 0.038), (2500, 0.04), (8000, 0.081)]
    # so close to the board the room adds little bass: (frequency [Hz], gain [dB])
    room_gain = [(350, -17), (900, -7.5)]
    # early reflections: (frequency [Hz], T60 [s])
    near_decay = [(300, 0.033), (3000, 0.086)]
    # left-right difference against the sum: (frequency [Hz], level [dB])
    board_spread = [(60, -28.5), (125, -25), (250, -28), (500, -22.5), (1100, -16.5), (2380, -30.5),
                    (4400, -22), (8120, -23.5), (13000, -12)]
    board = colour(claws() + drag(), thin_bass) + thumps()
    back = signal.fftconvolve(board, tail(room_decay, first_s=0.00653))[:N]
    across = signal.fftconvolve(board, tail(near_decay, first_s=0.0002))[:N]
    side = colour(across, board_spread) * [[1], [-1]]
    return board + colour(back, room_gain) + side + hum()


def band_limit(x):
    """A steep low-pass at the top of the band."""
    return signal.sosfilt(signal.butter(12, 15790, fs=SR, output="sos"), x)


def record(dry):
    """Uneven treble: a gap above 10 kHz, a narrow band, then a low shelf."""
    # (frequency [Hz], gain [dB])
    treble_gain = [(9900, -2.5), (10100, -21), (11050, -42), (11200, -11), (12000, -10), (12150, -24.5),
                   (14500, -25.5), (14700, -28.5), (16000, -36)]
    mix = colour(dry, treble_gain)
    return band_limit(mix)


dry = scene()
out = record(dry)
output_pcm(out)
```